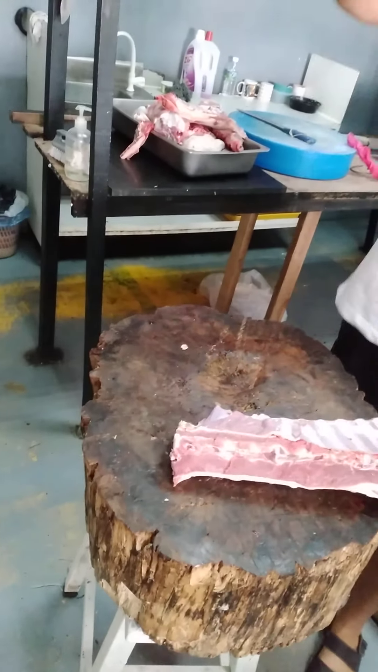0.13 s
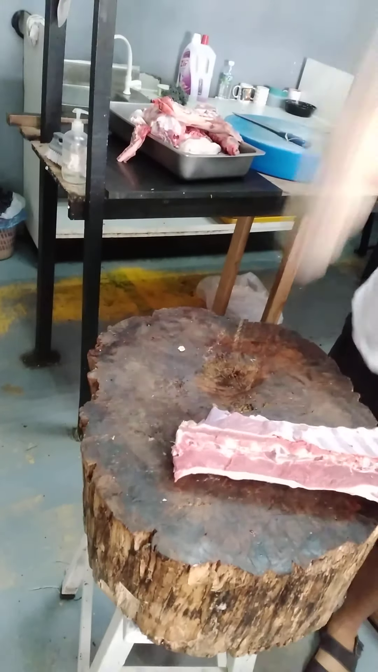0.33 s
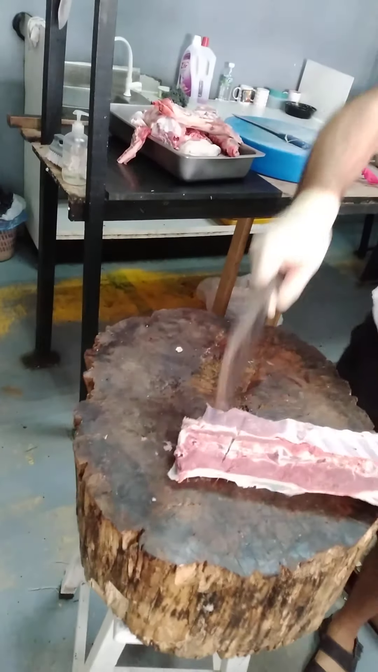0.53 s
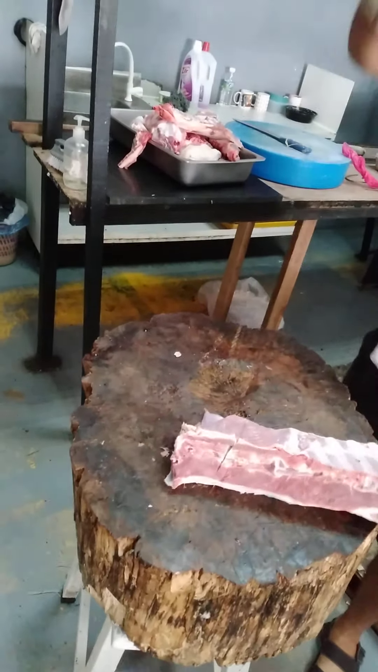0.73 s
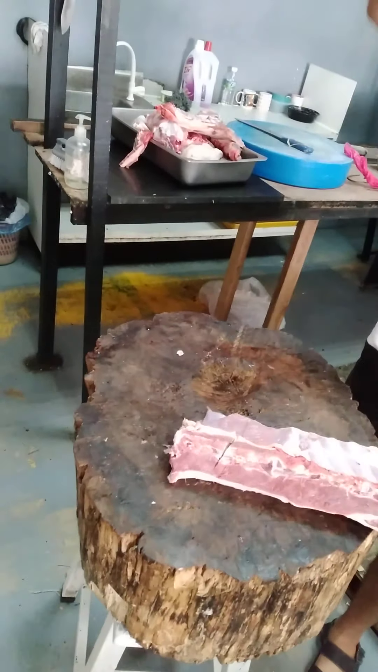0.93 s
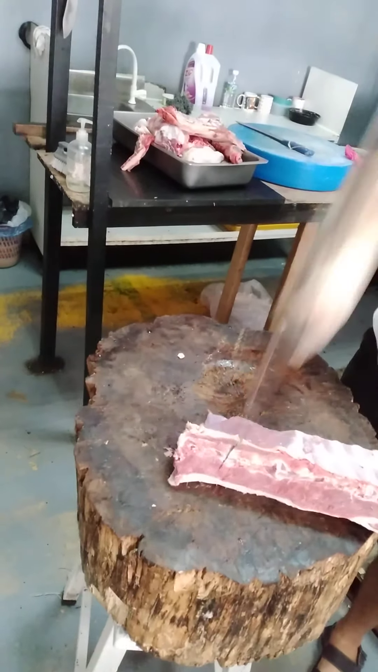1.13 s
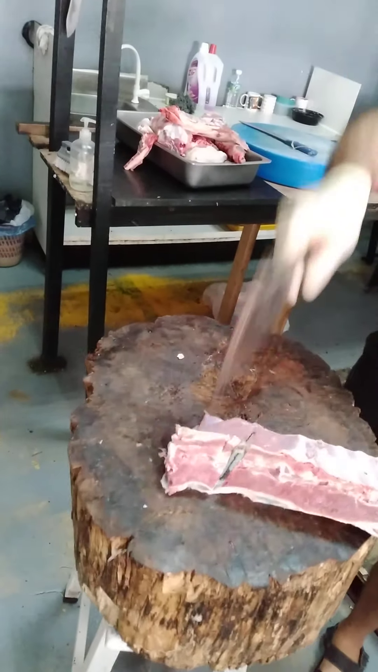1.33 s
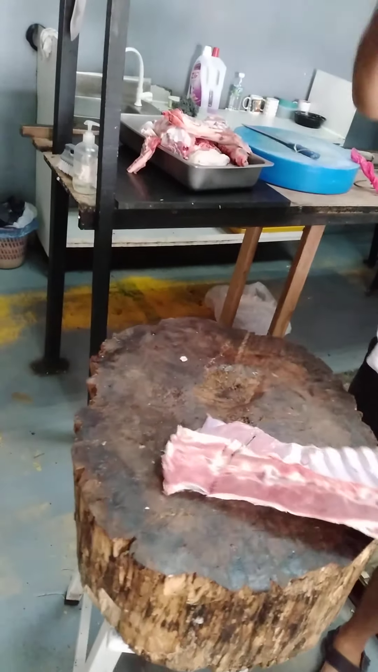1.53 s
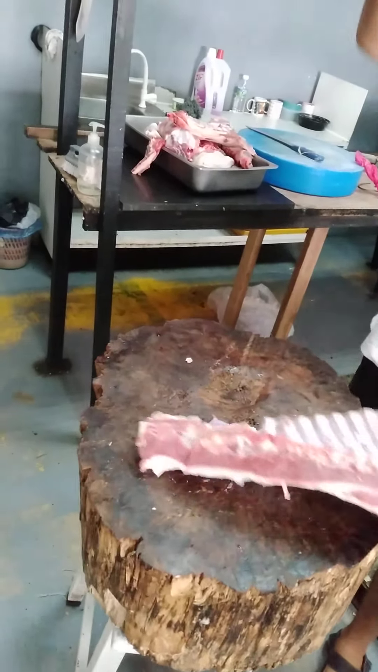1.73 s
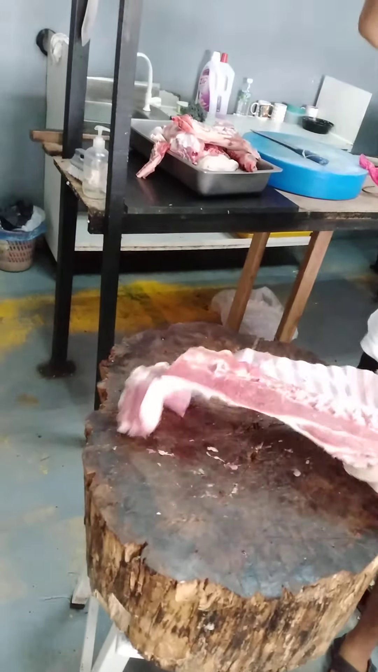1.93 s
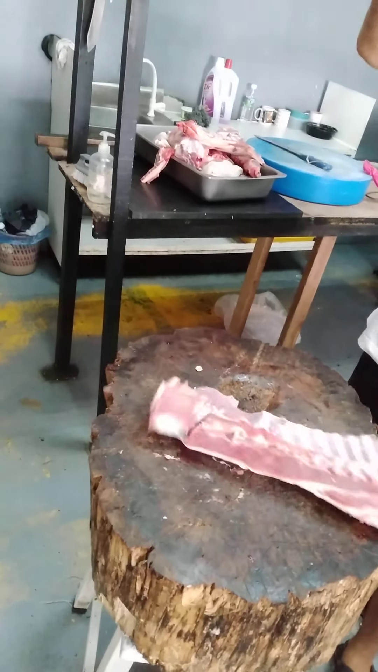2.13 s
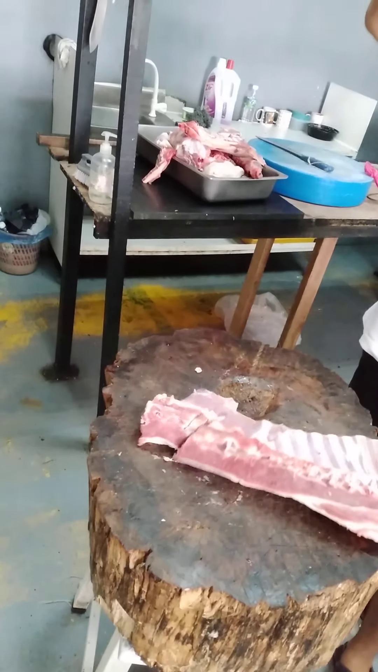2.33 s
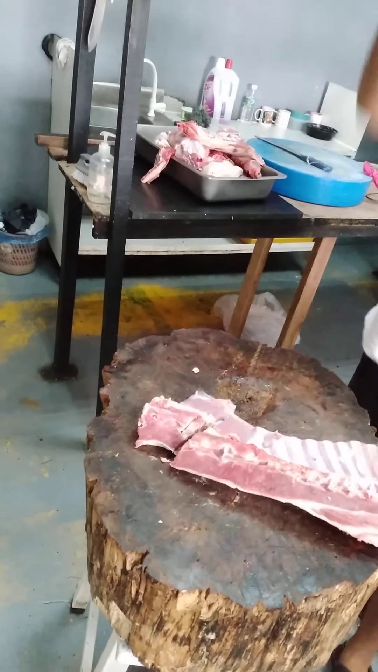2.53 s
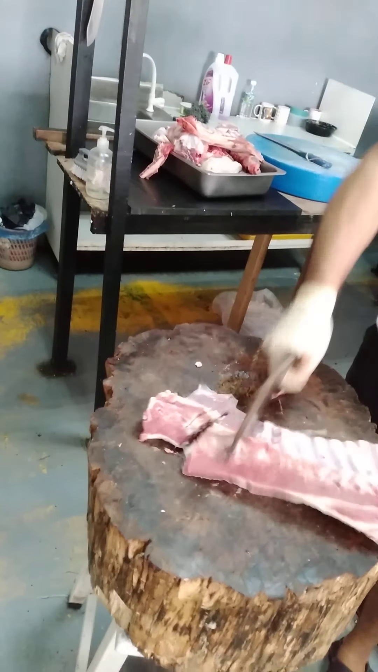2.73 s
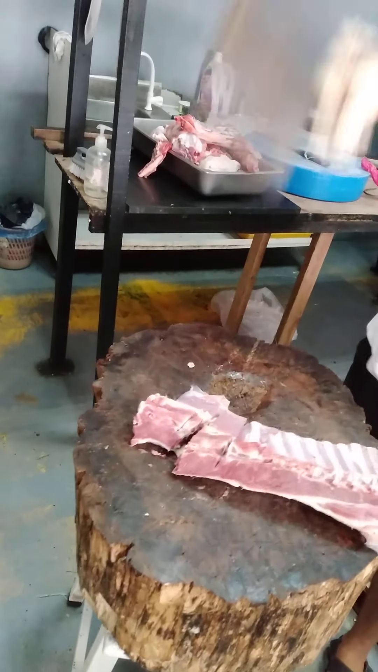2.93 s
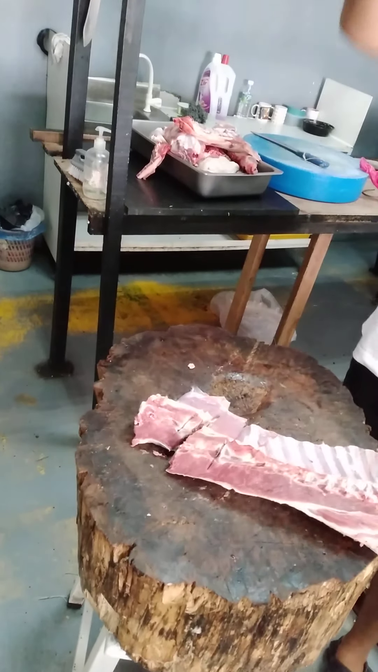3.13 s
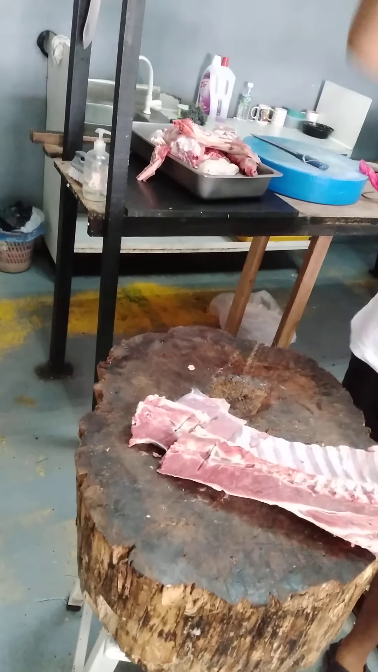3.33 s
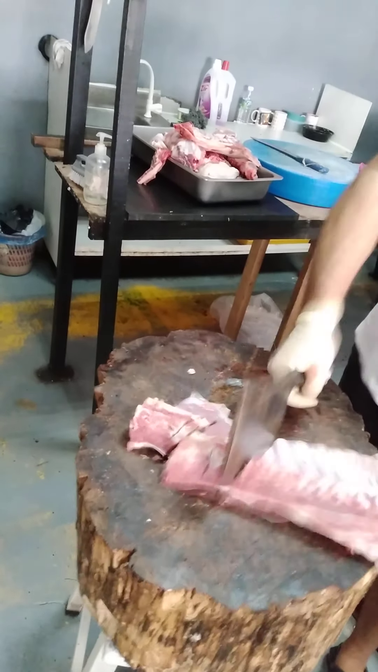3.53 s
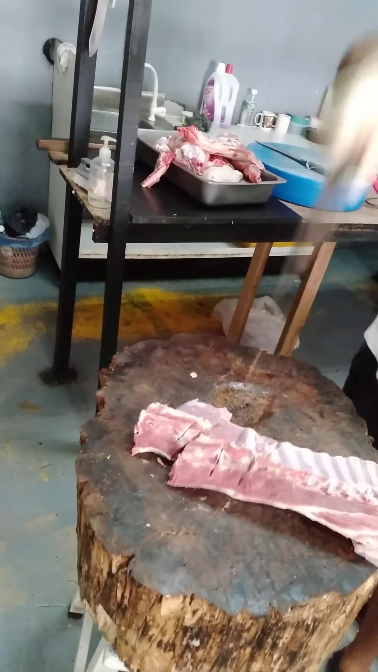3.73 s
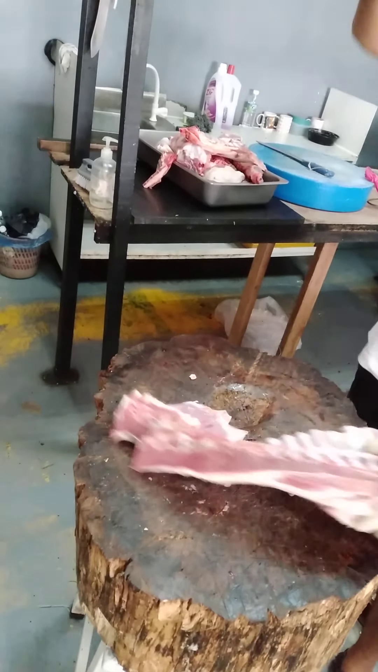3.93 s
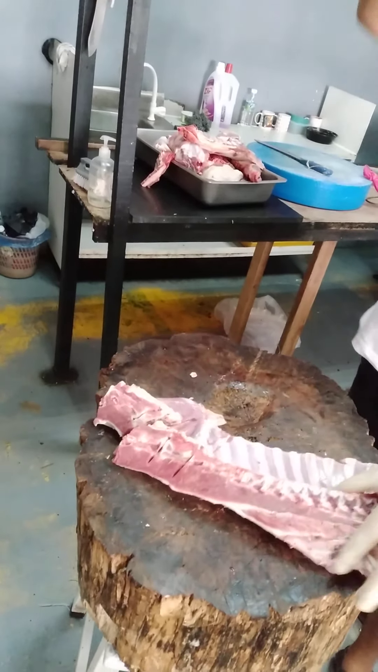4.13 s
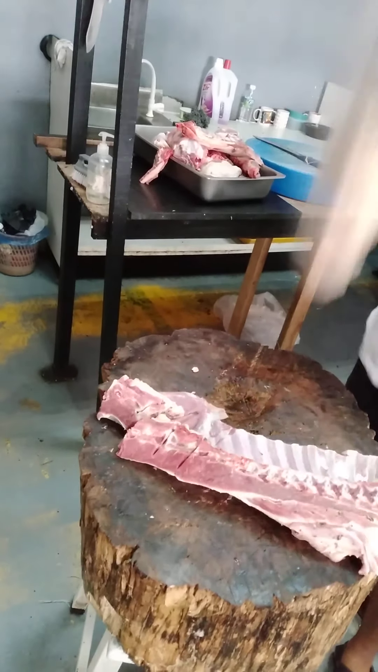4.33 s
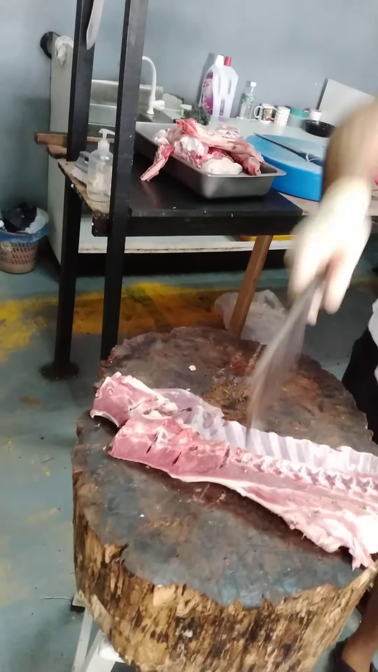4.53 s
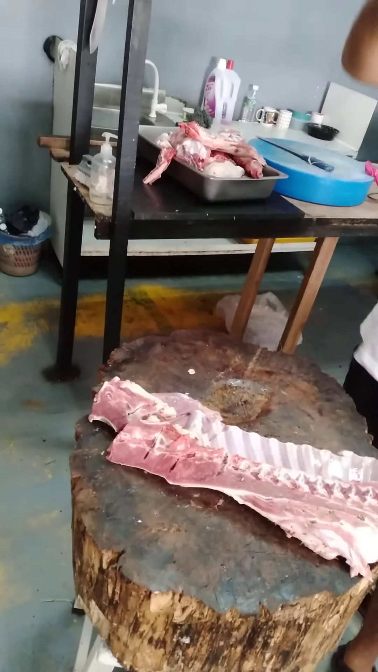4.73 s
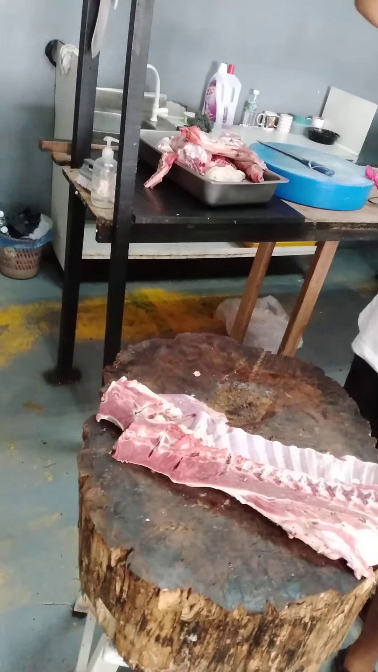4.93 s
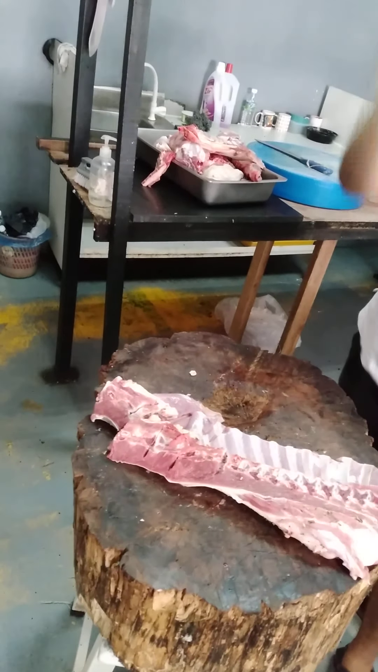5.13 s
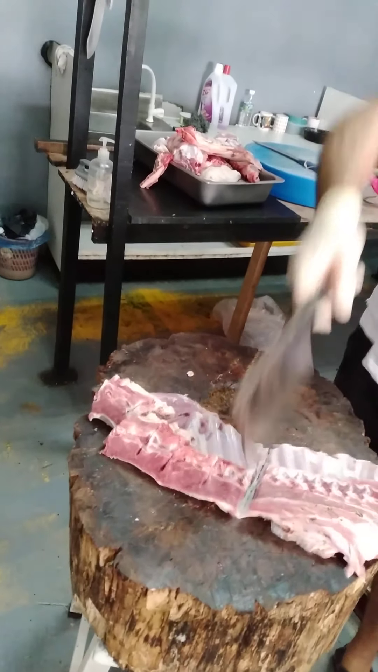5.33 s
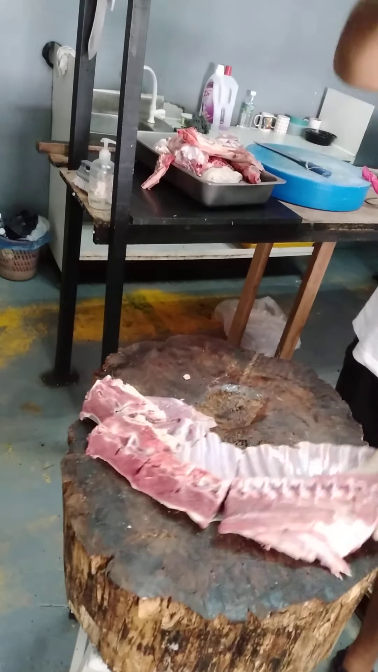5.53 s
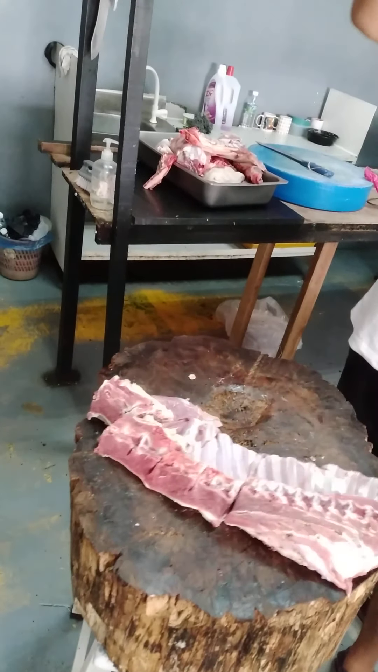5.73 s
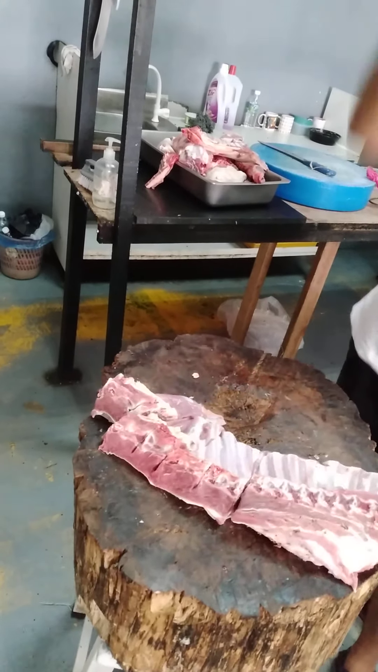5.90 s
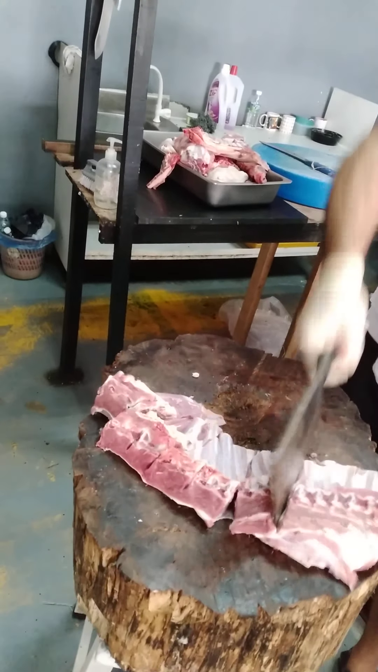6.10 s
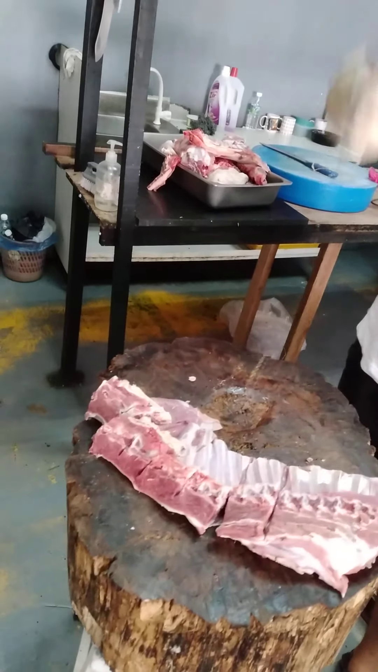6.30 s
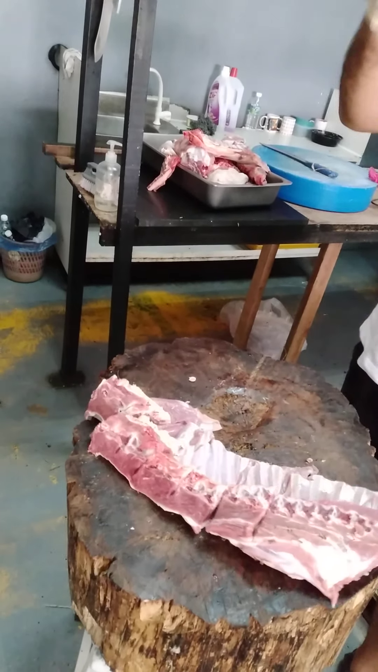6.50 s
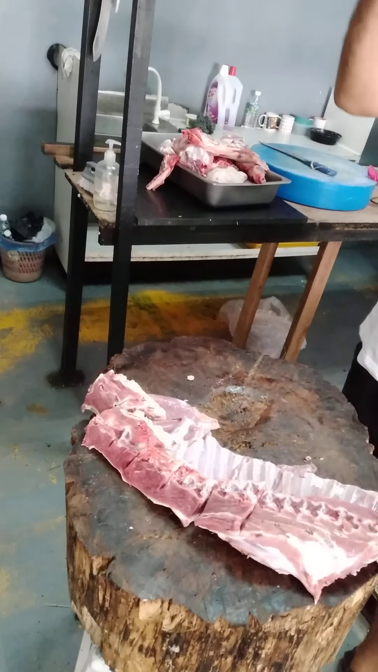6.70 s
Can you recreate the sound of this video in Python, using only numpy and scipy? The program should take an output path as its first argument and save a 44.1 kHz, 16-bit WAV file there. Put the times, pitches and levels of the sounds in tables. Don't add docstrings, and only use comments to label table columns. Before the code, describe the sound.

In a hard-walled butcher's room, a cleaver strikes ribs on a log block seven times, a little under a second apart apart from one longer pause, when the meat is softly flopped over. Each sharp, splintering crack overloads the close phone microphone, then echoes for about a second. Low cooling fans hum and a thin distant motor whine swells and fades.

```python
import sys
import numpy as np
from scipy import signal
from scipy.fft import rfft, irfft, next_fast_len
from scipy.io import wavfile
from scipy.ndimage import uniform_filter1d

SR = 44100
rng = np.random.default_rng(int(sys.argv[2]) if len(sys.argv) > 2 else 0)


def magnitude_from_level(level_db):
    exponent = np.asarray(level_db, float) / 20
    return 10 ** exponent


def persist_wave(psi):
    counts = np.round(np.clip(psi, -1, 1) * 32767).astype(np.int16)
    wavfile.write(sys.argv[1], SR, np.atleast_2d(counts).T)


N = 302526

# f/Hz, density/(dB per Hz)
AIR_COLOUR = [(12, -37), (20, -34), (32, -4.5), (79, -1), (105, -9.5), (300, -12), (600, -17.5),
              (1000, -17.5), (2000, -25), (4000, -35), (5000, -41.5), (8000, -48), (12000, -58),
              (16300, -65)]
AIR_LEVEL_DB = -36.5
# f/Hz, width/Hz, level/dB
COOLING_TONES = [(80.7, 2.1, -52), (100, 9.9, -59), (162.8, 9.7, -49), (274.8, 5.9, -53)]
# f/Hz, likeness/1
LIKENESS = [(60, 0.9), (180, 0.72), (550, 0.52), (1650, -0.23), (4970, 0.18), (15000, -0.3)]

# t/s, level/dB
MOTOR_SWELL = [(0, -84), (.6, -55), (1.2, -54), (1.9, -52.5), (2.2, -63), (2.7, -63), (3.2, -53),
               (3.6, -57), (4.3, -54), (5.1, -51), (5.9, -50.5), (6.5, -45.5), (6.86, -51.5)]
# multiple/1, level/dB
MOTOR_ORDERS = [(1, -1), (2, -8), (3, -12), (4, -21), (5, -26.5), (7, -37)]
MOTOR_HZ = 2042

# f/Hz, t60/s
ROOM_T60 = [(40, 1.6), (120, 0.84), (400, 0.97), (1400, 0.97), (3800, 0.84), (8000, 0.71), (16000, 0.39)]
# f/Hz, density/(dB per Hz)
IMPACT_COLOUR = [(21, -17), (35, -9), (65, -21), (100, -13), (235, -12), (500, -11), (1000, -8.5),
                 (2000, -6), (2560, -8), (3400, -10.5), (5000, -16.5), (8000, -24.5), (12000, -32.5),
                 (16300, -41)]
HOLLOW_HZ, HOLLOW_WIDTH_HZ, HOLLOW_DB = 2450, 234, -3.5

# t/s, level/dB, tilt/(dB per octave), decay/s
SLAPS = [
    (0.472, -8, -4, 0.014),
    (2.107, -32, -1.5, 0.004),
    (2.114, -25, -3.5, 0.0062),
    (2.169, -50, 0, .005),
    (4.462, -8, -1.5, 0.0055),
]
# t/s, peak level/dB, lowest f/Hz
SNAPS = [
    (.1305, -56, 8000),
    (.1535, -53, 10000),
    (.162, -58, 13000),
    (3.4545, -50, 6500),
    (3.459, -57, 6500),
    (3.875, -50, 5000),
    (4.131, -52, 7500),
    (4.1685, -53, 11000),
    (4.1685, -51, 7000),
    (4.218, -53, 12000),
]

# t/s, crack level/dB, room level/dB, tilt/(dB per octave), stand thud level/dB
CHOPS = [
    (0.4464, 0.5, -7.5, 0.1, 6),
    (1.2239, -3, -4.5, 0.63, 4),
    (2.7412, -3.8, -11.5, 2.13, 11),
    (3.579, -2.5, -4, -0.44, -9.5),
    (4.4407, -1.5, -7.5, -0.15, 0),
    (5.2606, 0.5, -6, -0.9, 0.4),
    (6.0731, 0, -4, -0.3, 0.5),
]
# log level/dB, bending level/dB, twisting level/dB, rib f/Hz, rib level/dB
RINGING = [
    (2.5, 0.3, -12, 2870, -10),
    (-0.5, 1.1, -21, 127, -3),
    (6, -25, -3.5, 4100, -30),
    (-5, -1.5, -11, 2000, -4),
    (1.5, -8.5, -5, 6970, -22.5),
    (-7.5, -6.5, -4.5, 2370, -11.5),
    (-3, -12, -2.5, 1410, -4.5),
]
# f/Hz, width/Hz, level/dB
STAND_MODES = [(52.2, 13.3, -3), (76.3, 12, -8), (167.5, 17.4, -5.5)]
LOG_MODES = [(327, 63, -5), (567, 183, -7)]
GRAIN_MODES = [(2113, 230, -8)]
BENDING_MODES = [(1657, 250, -8), (2900, 200, -13), (3436, 170, -6.5), (7030, 100, -30)]
TWISTING_MODES = [(3100, 150, -10), (4130, 170, -10.5), (4840, 100, -15), (5620, 200, -20),
                  (7940, 210, -23.5)]
RIB_WIDTH_HZ = 77

# left bias sag/full scale, right bias sag/full scale, left-right level/dB
SAGS = [(1.7, 1.9, .1), (1.05, 2.9, 3.5), (1.85, 1.7, -.2), (1.6, 2.8, .1), (1.8, 2.7, .7), (1.5, 2.1, .2),
        (.52, 2.45, -.8)]
SAG_S = (.0157, .0113)
COUPLING_HZ, COUPLING_Q = 2.42, .8
# f/Hz, gain/dB
LEFT_PORT = [(700, -2.28), (2000, -2), (5000, 0), (6000, 1), (7500, 11), (8000, 9), (8600, 1.5),
             (10400, -8), (12000, -11), (15000, 2), (16000, -4)]
RIGHT_PORT = [(700, -2.1), (2000, -5.5), (5000, -1.8), (6000, -2), (8000, -2), (9200, 3), (10400, 13),
              (11000, 8.5), (12000, 2.5), (15000, -5), (16000, -44)]


def evened(x):
    return x / np.sqrt(np.mean(x ** 2) + 1e-20)


def read(points, hz):
    f, value = np.transpose(points)
    return np.interp(np.log(hz + 1), np.log(f + 1), value)


def add(mix, s, sound):
    part = mix[:, round(s * SR):][:, :sound.shape[1]]
    part += sound[:, :part.shape[1]]


def causal(gain_db):
    log = np.log(magnitude_from_level(np.maximum(gain_db, -100)))
    log = np.concatenate([log, log[-2:0:-1]])
    taps = np.fft.ifft(np.exp(log - 1j * signal.hilbert(log).imag)).real[:8192]
    return taps / np.linalg.norm(taps)


def paired(x):
    size = next_fast_len(x.shape[1])
    z, hz = rfft(x, size), np.fft.rfftfreq(size, 1 / SR)
    same = np.clip(read(LIKENESS, hz), -1, 1)
    right = same * z[0] + np.sqrt(1 - same ** 2) * z[1]
    return irfft([z[0], right], size)[:, :x.shape[1]]


def fuzzy(hz, width_hz):
    size = next_fast_len(N)
    f = np.fft.rfftfreq(size, 1 / SR)
    z = rfft(rng.standard_normal((2, N)), size)
    return evened(irfft(z / (1 + (2 * (f - hz) / width_hz) ** 2), size)[:, :N])


def shop():
    frames, hz = N // 512 + 5, np.fft.rfftfreq(2048, 1 / SR)
    a, b, c, d, patches = rng.standard_normal((frames, 1025, 5)).T
    patches = evened(uniform_filter1d(uniform_filter1d(patches, 14, 0), 7, 1))
    swell = evened(uniform_filter1d(rng.standard_normal(frames), 30))
    level_db = read(AIR_COLOUR, hz)[:, None] + 0.72 * patches + 0.44 * swell
    z = np.array([a + 1j * b, c + 1j * d]) * magnitude_from_level(level_db)
    air = signal.istft(z, nperseg=2048, noverlap=1536)[1][:, :N]
    tones = sum(magnitude_from_level(db) * fuzzy(f, width_hz) for f, width_hz, db in COOLING_TONES)
    return paired(magnitude_from_level(AIR_LEVEL_DB) * evened(air) + tones)


def motor():
    throb_db = 2.2 * fuzzy(0, 40)[0]
    level_db = np.interp(np.arange(N) / SR, *np.transpose(MOTOR_SWELL)) + throb_db
    stack = sum(magnitude_from_level(db) * fuzzy(k * MOTOR_HZ, 90 + 14 * k) for k, db in MOTOR_ORDERS)
    return magnitude_from_level(level_db) * stack


def echoes(size):
    hz, t, z = signal.stft(rng.standard_normal((2, size)), SR, nperseg=512)
    patches = evened(uniform_filter1d(uniform_filter1d(rng.standard_normal(z.shape[1:]), 6, 0), 6, 1))
    bass_rise = 1 - np.exp(-(t + 0.0027) * (hz[:, None] + 100) / 4.0)
    decay_db = -60 * t / read(ROOM_T60, hz)[:, None]
    z = z * bass_rise * magnitude_from_level(1.65 * patches + decay_db)
    tail = signal.istft(z, SR, nperseg=512)[1][:, :size]
    build_up = 1 - np.exp(-np.arange(size) / SR / 0.0035)
    return paired(tail) * build_up * np.sqrt(np.linspace(1, 0, size))


def strike(tilt_db, rings, crack_db, room_db, crack_s, push, size):
    hz = np.fft.rfftfreq(16384, 1 / SR)
    ringing = sum(magnitude_from_level(2 * (db - read(IMPACT_COLOUR, f))) / (1 + (2 * (hz - f) / width_hz) ** 2) ** 1.19
                  for f, width_hz, db in rings)
    hollow_db = HOLLOW_DB / (1 + (2 * (hz - HOLLOW_HZ) / HOLLOW_WIDTH_HZ) ** 2)
    tilted_db = read(IMPACT_COLOUR, hz) + tilt_db * np.log2(hz / 1500 + 0.11)
    colour = causal(tilted_db + 10 * np.log10(1 + 3.5 * ringing) + hollow_db)

    t = np.arange(2000) / SR
    splinters = rng.standard_normal((3, 2000))
    crack = splinters[0] + 1.06 * splinters[1:]
    crack = crack * np.exp(-t / crack_s) * (1 - np.exp(-t / 0.00015))
    crack[:, :9] += push
    thin_crack = signal.lfilter(*signal.butter(1, 450, "high", fs=SR), crack)

    answer = magnitude_from_level(room_db) * echoes(size)
    answer[:, :2000] += magnitude_from_level(crack_db) * thin_crack
    return signal.fftconvolve(answer, colour[None], axes=1)


def meat():
    out = np.zeros((2, N))
    for s, db, tilt_db, decay_s in SLAPS:
        add(out, s, strike(tilt_db, [], db, db - 12, decay_s, 0, size=16384))
    for s, db, hz in SNAPS:
        snap = rng.standard_normal((2, 300)) * np.exp(-np.arange(300) / 40)
        high_pass = signal.butter(4, hz, "high", fs=SR, output="sos")
        add(out, s, magnitude_from_level(db) * signal.sosfilt(high_pass, snap))
    return out


def cleaver():
    out = np.zeros((2, N))
    bodies = STAND_MODES, LOG_MODES, BENDING_MODES, TWISTING_MODES
    for chop, (*force_db, rib_hz, rib_db), (*_, pan_db) in zip(CHOPS, RINGING, SAGS):
        s, crack_db, room_db, tilt_db, thud_db = chop
        rib_width_hz = RIB_WIDTH_HZ * np.sqrt(rib_hz / 1e3)
        rings = list(GRAIN_MODES) + [(rib_hz, rib_width_hz, rib_db)]
        for modes, by_db in zip(bodies, (thud_db, *force_db)):
            rings += [(hz, width_hz, db + by_db) for hz, width_hz, db in modes]
        blow = strike(tilt_db, rings, crack_db, room_db, 0.0041, 0.99, size=49152)
        add(out, s, blow * magnitude_from_level([[pan_db / 2], [-pan_db / 2]]))
    return out


def scene():
    return cleaver() + meat() + motor() + shop()


def bias_swing():
    sag = np.zeros((2, N))
    t = np.arange(SR // 4) / SR / np.array(SAG_S)[:, None]
    for (s, *_), (*depth, _) in zip(CHOPS, SAGS):
        add(sag, s, -np.array(depth)[:, None] * t * np.exp(1 - t))
    w = 2 * np.pi * COUPLING_HZ
    high_pass = signal.bilinear([1, 0, 0], [1, w / COUPLING_Q, w * w], SR)
    swing = signal.lfilter(*high_pass, sag)
    return np.where(swing < 0, .86 * np.tanh(swing / .86), swing)


def roll_off(x):
    return signal.sosfilt(signal.butter(12, 16450, fs=SR, output="sos"), x)


def record(dry):
    hz = np.fft.rfftfreq(4096, 1 / SR)
    ports = []
    for x, port in zip(dry, (LEFT_PORT, RIGHT_PORT)):
        gain_db = read(port, hz)
        taps = causal(gain_db) * np.sqrt(np.mean(magnitude_from_level(2 * gain_db)))
        ports.append(signal.oaconvolve(x, taps)[:N])
    mix = np.clip(np.array(ports) + bias_swing(), -1, 1)
    return roll_off(mix)


dry = scene()
out = record(dry)
persist_wave(out)
```